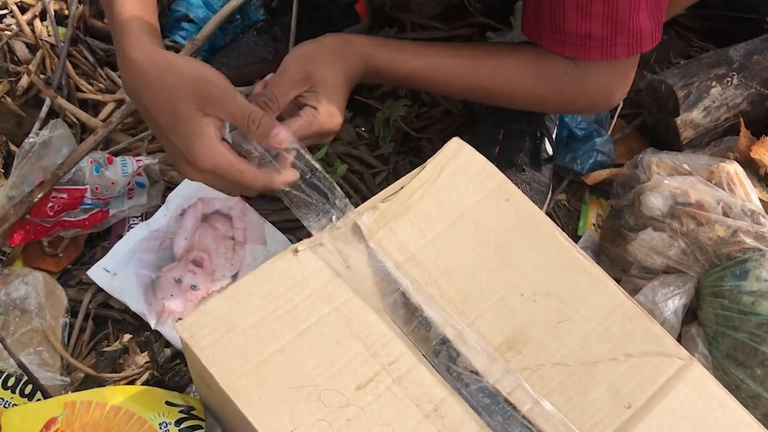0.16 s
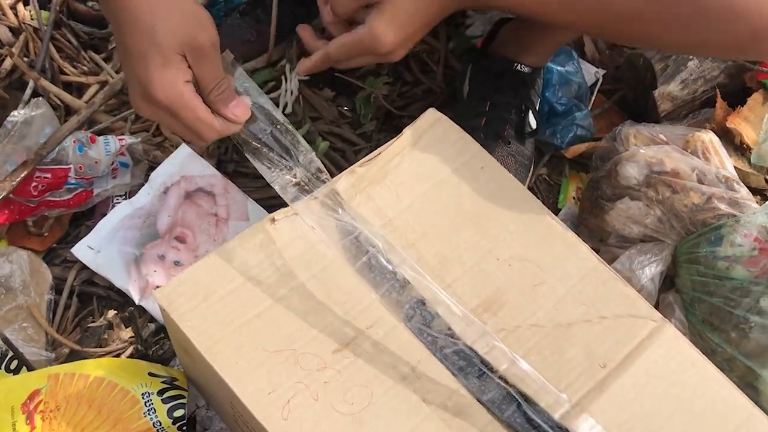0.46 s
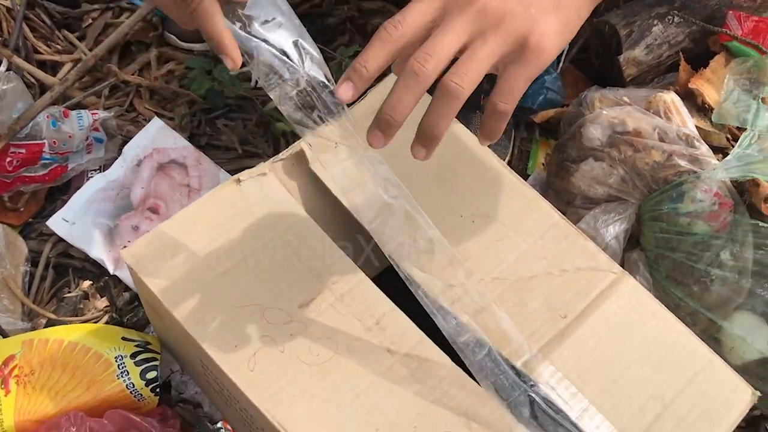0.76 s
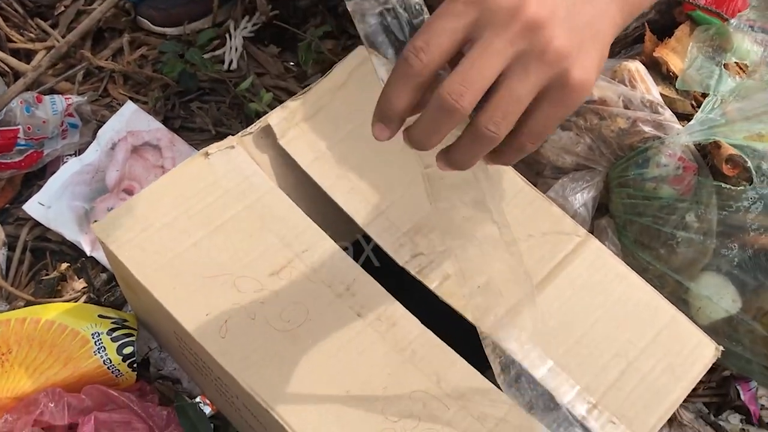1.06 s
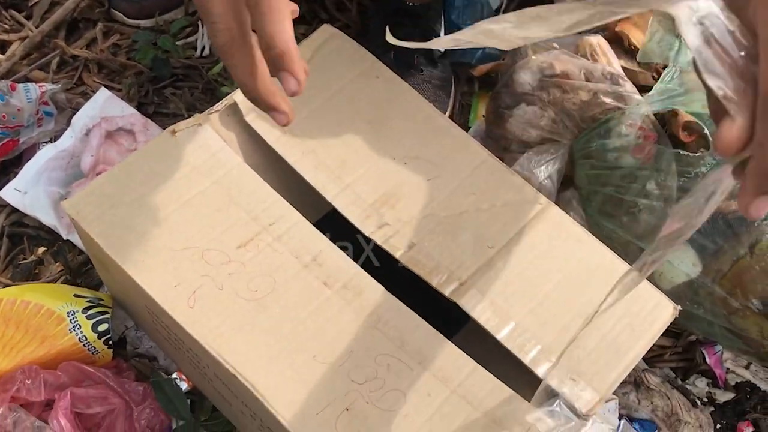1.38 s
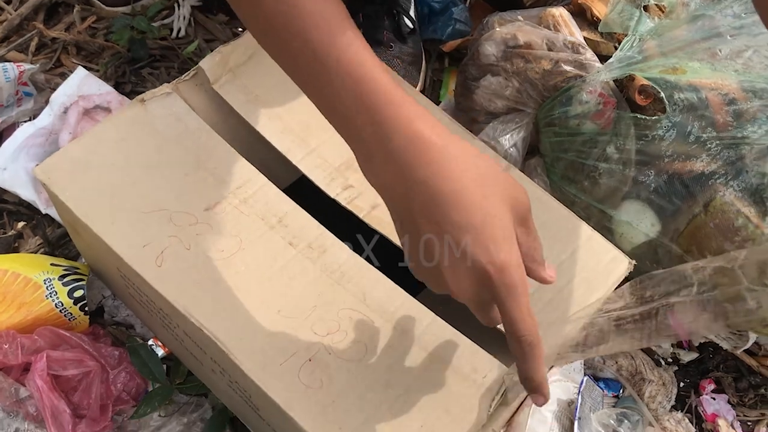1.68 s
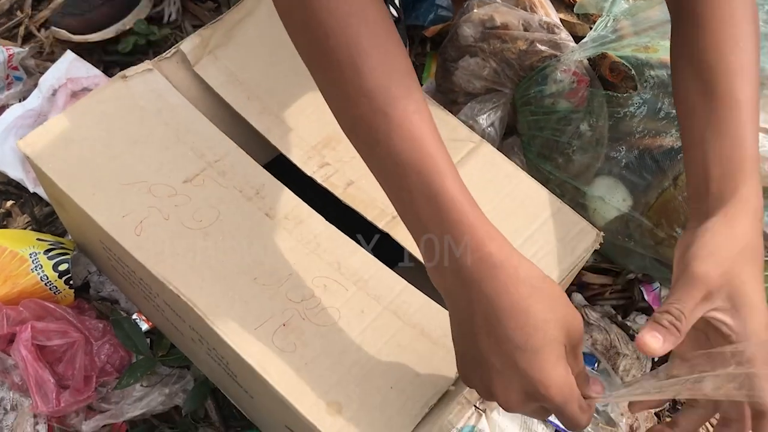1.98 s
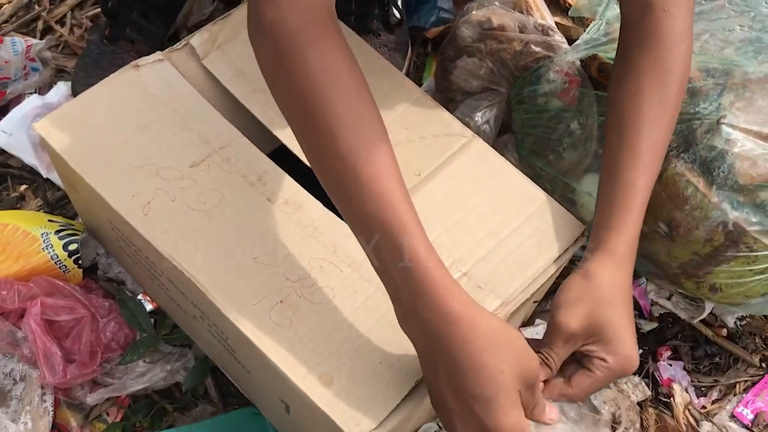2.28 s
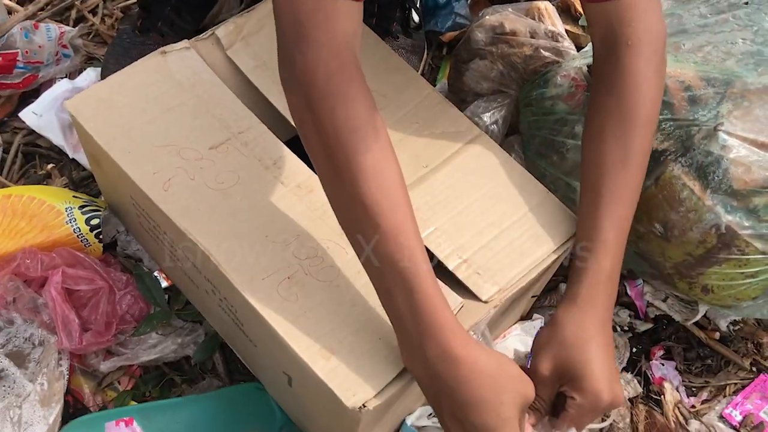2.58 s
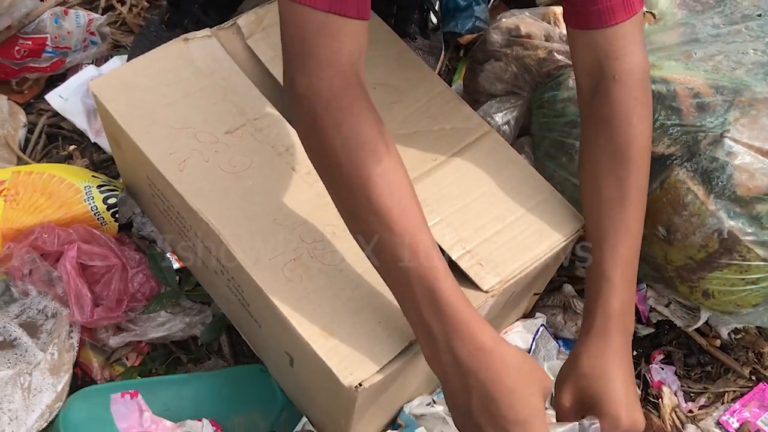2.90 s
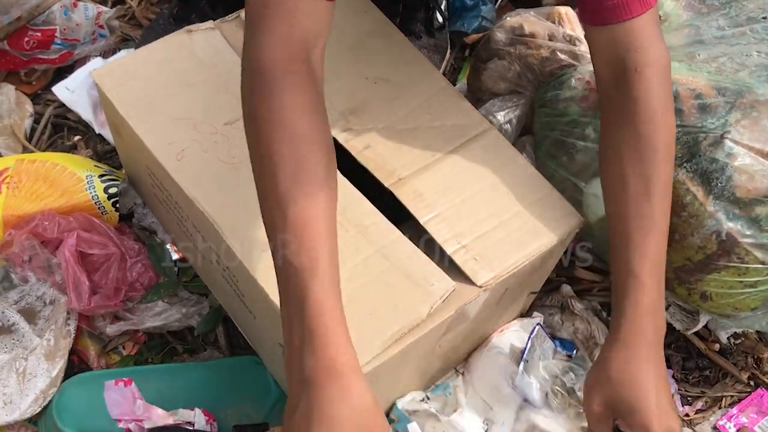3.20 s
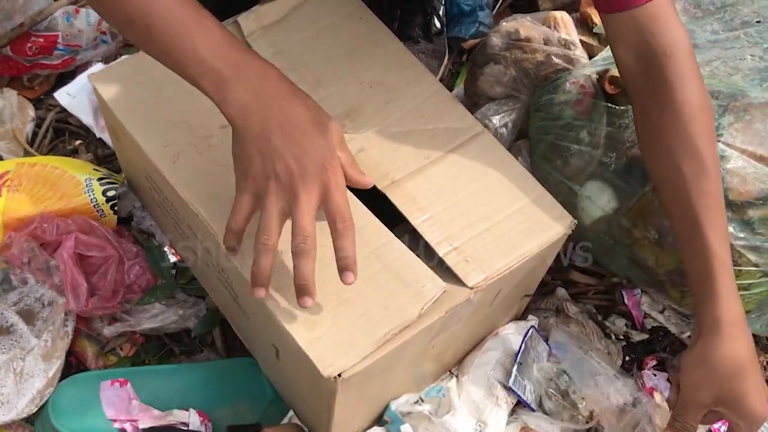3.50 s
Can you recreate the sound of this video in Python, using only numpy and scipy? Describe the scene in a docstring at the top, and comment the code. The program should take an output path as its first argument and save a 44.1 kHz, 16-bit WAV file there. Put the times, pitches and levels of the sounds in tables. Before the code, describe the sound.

Tape crackling and snapping off a hollow cardboard box, which knocks and scrapes near the end.

```python
"""Peeling tape off a box, outdoors

Hands peel clear packing tape off a cardboard box outdoors, close to a phone microphone.
Glue slips crackle as clustered noise bursts through the film and card; the film snaps as short ringing bursts.
The box knocks and scrapes over litter, its hollow card ringing as decaying modes.
Far off come uneven low thumps, as pulsed sines, over the faint rumble and hiss of filtered noise."""
import sys
import numpy as np
from scipy import signal
from scipy.fft import rfft, irfft
from scipy.io import wavfile
from scipy.ndimage import uniform_filter1d

SR = 44100
rng = np.random.default_rng(int(sys.argv[2]) if len(sys.argv) > 2 else 0)


def generate_wav(signal):
    """Clip the signal to [-1, 1] and save it as 16-bit WAV at the path in sys.argv[1]."""
    frames = np.transpose(np.atleast_2d(signal))
    scaled = np.clip(frames, -1, 1) * 32767
    pcm = np.round(scaled).astype(np.int16)
    wavfile.write(sys.argv[1], SR, pcm)


N = 160965  # samples

# Close: crackle of the peeling tape: t/s, level of the film/dB, level of the card against the film/dB
PEEL_LEVELS = [(0.0, -59, -4), (0.033, -48, -6.5), (0.076, -67, 0), (0.225, -64, -4.5), (0.259, -57, 0),
               (0.348, -55.5, -9.5), (0.365, -44, -0.5), (0.396, -48, -15.5), (0.408, -26.5, -16.5),
               (0.42, -43, -14), (0.436, -52, 2.5), (0.507, -55, -1), (0.687, -53, -12.5),
               (0.728, -37, -12.5), (0.776, -60.5, 0.5), (0.962, -60.5, -6), (1.005, -44.5, -17.5),
               (1.032, -45, 8.5), (1.075, -59, -1), (1.1, -47.5, -8), (1.182, -63.5, -8), (1.21, -47, -6.5),
               (1.254, -42.5, -22), (1.29, -48.5, -3.5), (1.337, -67, -12), (1.659, -64, -3.5),
               (1.757, -62.5, -6.5), (1.834, -48.5, -2.5), (1.95, -50.5, -9.5), (2.075, -44.5, -7.5),
               (2.118, -55.5, 2.5), (2.225, -55, -4), (2.386, -46.5, 0), (2.681, -52, 5), (2.775, -42, 3),
               (2.848, -52, 1), (2.873, -39, -1), (2.897, -56, 4.5), (3.143, -52, -7), (3.202, -47.5, 0),
               (3.233, -78, -4), (3.359, -59.5, -5.5), (3.588, -74.5, -5), (3.615, -57, -3.5),
               (3.65, -50.5, -1.5)]
# How unevenly the glue lets go: t/s, share of the full scatter
GLUE_UNEVENNESS = [(1.85, 0.85), (1.92, 0.21), (2.09, 0.44), (2.17, 1.1), (2.45, 0.69), (2.95, 0.63),
                   (3.1, 0.96)]
# Tone of the crackle through the film: f/Hz, relative level/dB
FILM_TONE = [(500, -29.5), (2500, 0.5), (4000, 3), (10300, -1.5), (13000, 3), (15600, 0.5), (16300, -60)]
# Tone of the crackle through the card: f/Hz, relative level/dB
CARD_TONE = [(100, -48.5), (300, 12), (600, 8.5), (1400, 9), (2300, 4), (3500, 0), (6000, -47)]
# Close: snaps of the film, levels over the first 3 ms as a sine of equal power:
# t/s, ring level/dB, ring f/Hz, treble level/dB
FILM_SNAPS = [(0.0507, -35, 2430, -66), (0.072, -41.5, 3730, -49), (0.1896, -41, 1520, -48.5),
              (0.297, -37.5, 3160, -42), (0.3335, -36.5, 3600, -57), (0.3413, -40.5, 2210, -53),
              (0.3687, -36, 2920, -38), (0.382, -54, 4500, -38.5), (0.4221, -45, 4000, -36),
              (0.51, -41.5, 4730, -48), (0.568, -45.5, 3500, -65), (0.584, -45.5, 2500, -55),
              (0.6009, -41.5, 2960, -43), (0.65, -38.5, 4140, -61), (0.6688, -37.5, 3540, -53),
              (0.823, -34.5, 3750, -51), (0.871, -33.5, 4000, -68), (0.9194, -41.5, 2530, -62),
              (0.9748, -39.5, 4200, -64), (1.0268, -35, 4000, -46), (1.0315, -20, 4200, -35),
              (1.0493, -39, 2690, -34.5), (1.17, -42, 2770, -61), (1.2075, -37, 3460, -54),
              (1.2734, -32, 3000, -30.5), (1.294, -39, 3030, -36.5), (1.5411, -48.5, 4490, -44),
              (1.5993, -47, 1870, -68), (1.6469, -41, 1400, -56), (1.7039, -53, 3220, -43),
              (1.8082, -42.5, 3980, -45), (1.8253, -32, 3760, -37), (1.8376, -34.5, 3900, -49),
              (1.877, -37.5, 2950, -35.5), (2.141, -51, 4500, -42.5), (2.248, -37, 2240, -42),
              (2.2721, -43, 2960, -38), (2.3026, -45, 4000, -36.5), (2.3873, -39, 2100, -35.5),
              (2.4165, -41, 3500, -42), (2.54, -49, 2520, -34), (2.5687, -44, 2160, -35.5),
              (2.593, -38, 1930, -30), (2.6133, -23, 1700, -19.5), (2.728, -40, 2120, -32.5),
              (2.7555, -33.5, 2900, -45), (2.874, -26.5, 2200, -39), (3.003, -44, 2170, -64),
              (3.0886, -51, 4400, -40.5), (3.14, -17, 3500, -21.5), (3.1744, -28, 2300, -36),
              (3.198, -39, 1037, -43), (3.251, -49.5, 2900, -48), (3.3124, -42.5, 2640, -52),
              (3.3841, -48, 2830, -68), (3.4609, -50, 4120, -60), (3.524, -47, 2970, -69),
              (3.5574, -41, 2210, -45.5)]
# Modes of the hollow box, deepest first: f/Hz, relative level/dB, t60/s
BOX_MODES = [(94.7, -9, 0.038), (203.6, -2, 0.11), (245.3, -3, 0.085), (302.3, -1.5, 0.061),
             (418, -5, 0.042), (570, -9.5, 0.027), (704, -1, 0.028), (1050, 3, 0.012), (1558, -0.5, 0.026),
             (1955, 5, 0.011)]
# Close: knocks on the box: t/s, peak level/dB, pitch f/Hz
BOX_KNOCKS = [(.189, -32.5, 346), (.19, -40.5, 1020), (0.448, -42, 700), (1.0315, -17, 1440),
              (1.033, -28, 279.5), (1.274, -30.5, 2000), (1.276, -38, 740), (1.647, -36.5, 1195),
              (2.071, -45, 500), (2.307, -39, 780), (2.435, -30, 597), (2.616, -31, 244), (2.757, -30, 202),
              (2.872, -29.5, 536), (3.1401, -14.5, 2160), (3.142, -21, 880), (3.196, -30.5, 580)]
# Close: box shifting under the pull: t/s, scrape level/dB, deep rumble level/dB
BOX_SCRAPE = [(2.2, -69, -56.5), (2.34, -64, -60), (2.365, -62, -40), (2.43, -53, -51),
              (2.47, -48.5, -40.5), (2.53, -46.5, -38.5), (2.556, -54, -56), (2.62, -42, -59),
              (2.68, -41.5, -53), (2.7, -50, -68), (2.77, -34, -53), (2.82, -41, -45), (2.92, -45.5, -64),
              (3.06, -65, -62)]
# Far: low thumps: t/s
THUMP_TIMES = [0.041, 0.212, 0.32, .4, .585, .799, 1.05, 1.474, 1.611, 1.744, 3.081, 3.225, 3.357, 3.478,
               3.601]
# Tone of the open air: f/Hz, relative level/dB
AIR_TONE = [(18, -71), (30, 6.5), (134, -1.5), (600, -14.5), (1670, -13), (12300, -31), (16000, -46)]

# Glue: the spreads (dB) are those at full scatter
SLIPS_PER_S, SLIP_SPREAD_DB, SLIP_T60_S = 3500, 3.0, 0.0017
CLUSTERS_PER_S, CLUSTER_DB = 120, 3.5
# Lone larger slips: least level before each is scaled down at random, mean excess over it
TICKS_PER_S, TICK_DB, TICK_SPREAD_DB, TICK_T60_S = 220, 7, 2.5, 0.0064
# Film: ring width as a share of its pitch, then the burst and its sharp lead
SNAP_WIDTH, SNAP_TREBLE_HZ = 0.98, 4800
SNAP_SPREAD_DB, SNAP_T60_S, SNAP_LEAD_DB, SNAP_LEAD_S = 4, 0.02, 7, 0.0004
# Box: reach of a knock around its pitch, scatter of the modes
KNOCK_REACH_OCT, KNOCK_SCATTER_DB = 0.36, 4
RATTLE_DB, RATTLE_T60_S = -36, 0.04  # gain on cubed noise, against a unit blow
# Far thumps: peak of the envelope, pitch and its relative scatter
THUMP_DB, THUMP_HZ, THUMP_RISE_S, THUMP_SCATTER = -45.5, 54.4, 0.0074, 0.025
AIR_DB = -68  # middle level of the air
LOW_EDGE_HZ, HIGH_EDGE_HZ = 62.3, 16700


def undb(db):
    """Amplitude of a level in dB."""
    return 10 ** (np.asarray(db) / 20)


def unit(x):
    """Scale to an RMS of 1."""
    return x / np.sqrt(np.mean(x ** 2))


def curve(table, column):
    """A column of a table, drawn as straight lines in time."""
    table = np.array(table)
    return np.interp(np.arange(N) / SR, table[:, 0], table[:, column])


def colour(x, points):
    """Minimum-phase filter with the (f/Hz, level/dB) shape."""
    hz, db = np.array(points).T
    grid_hz = np.fft.rfftfreq(4096, 1 / SR)
    log_gain = np.interp(np.log(grid_hz + 1), np.log(hz), db) * np.log(10) / 20
    # Folding the cepstrum onto positive time makes the filter causal
    cepstrum = irfft(log_gain)
    cepstrum[1:2048] *= 2
    cepstrum[2049:] = 0
    response = irfft(np.exp(rfft(cepstrum)))
    return signal.fftconvolve(x, response)[:len(x)]


def walk(rate):
    """Random levels held 1 / rate s and slewed; spread near 1."""
    hold = int(SR / rate)
    steps = np.repeat(rng.standard_normal(N // hold + 1), hold)
    return uniform_filter1d(steps, hold // 2 + 1)[:N]


def add(out, x, s):
    """Mix x into out from s seconds on."""
    i = int(s * SR)
    out[i:i + len(x)] += x[:len(out) - i]


def ring(x, modes):
    """Sum of decaying modes driven by x."""
    t = np.arange(SR // 2) / SR
    response = sum(undb(db) * np.sin(2 * np.pi * hz * t) * 1000.0 ** (-t / t60)
                   for hz, db, t60 in modes)
    return signal.fftconvolve(x, response)[:len(x)]


def decay_power(clicks, t60):
    """Power of clicks that each die away by 60 dB in t60."""
    fall = 1e6 ** (-np.arange(900) / SR / t60)
    return signal.fftconvolve(clicks ** 2, fall)[:N]


def slips(cluster_db, ticks):
    """Tiny releases of glue: unequal clicks with short noisy tails, in clusters; level near 1."""
    when, size, tick_share = rng.random((3, N))
    uneven = curve(GLUE_UNEVENNESS, 1)
    clicks = (when < SLIPS_PER_S / SR) * undb(-SLIP_SPREAD_DB * uneven * np.log(size))
    power = decay_power(clicks, SLIP_T60_S) * undb(2 * cluster_db * uneven)
    power = power + decay_power(ticks * uneven * tick_share, TICK_T60_S)
    # Level against the mean of the surrounding 100 ms
    power = np.abs(power / uniform_filter1d(power, size=SR // 10))
    return np.sqrt(power) * rng.standard_normal(N)


def peel():
    """Slips sound through film patches, each with its own pitch and flicker, and through the card."""
    film_db = curve(PEEL_LEVELS, 1)
    card_db = film_db + curve(PEEL_LEVELS, 2)
    cluster_db = CLUSTER_DB * walk(CLUSTERS_PER_S)
    when, size = rng.random((2, N))
    ticks = (when < TICKS_PER_S / SR) * undb(TICK_DB - TICK_SPREAD_DB * np.log(size))
    film = np.zeros(N)
    for band_hz in (2000, 5500), (5500, 10000), (10000, 18000):
        patch = signal.butter(1, band_hz, "band", fs=SR, output="sos")
        film += signal.sosfilt(patch, slips(cluster_db + 4.9 * walk(90), ticks))
    card = colour(slips(cluster_db + 4.2 * walk(60), ticks / 2), CARD_TONE)
    return unit(colour(film, FILM_TONE)) * undb(film_db) + unit(card) * undb(card_db)


def level_head(x):
    """Scale the first 3 ms to the power of a sine of amplitude 1."""
    return x / np.sqrt(2 * np.mean(x[:130] ** 2))


def snaps():
    """Each snap is a sharp, dying noise burst: a broad ring of the film and a treble tick."""
    out = np.zeros(N)
    t = np.arange(2200) / SR
    treble = signal.butter(2, (SNAP_TREBLE_HZ, 16000), "band", fs=SR, output="sos")
    lead = 1 + undb(SNAP_LEAD_DB) * np.exp(-t / SNAP_LEAD_S)
    envelope = lead * 1000.0 ** (-t / SNAP_T60_S)
    for s, ring_db, hz, treble_db in FILM_SNAPS:
        noise, rough = rng.standard_normal((2, len(t)))
        # Averaging 9 samples cuts the spread to a third; 3 restores it
        flicker_db = SNAP_SPREAD_DB * uniform_filter1d(rough, size=9) * 3
        burst = noise * envelope * undb(flicker_db)
        body = signal.lfilter(*signal.iirpeak(hz, 1 / SNAP_WIDTH, SR), burst)
        tick = signal.sosfilt(treble, burst)
        add(out, level_head(body) * undb(ring_db) + level_head(tick) * undb(treble_db), s)
    return out


def knocks():
    """Each knock wakes the box modes near its own pitch and rattles briefly on small contacts."""
    out = np.zeros(N)
    t = np.arange(SR // 4) / SR
    for s, peak_db, near_hz in BOX_KNOCKS:
        modes = []
        for hz, mode_db, t60 in BOX_MODES[1:]:
            off_pitch_db = 10 * (np.log2(hz / near_hz) / KNOCK_REACH_OCT) ** 2
            scatter_db = KNOCK_SCATTER_DB * rng.standard_normal()
            modes.append((hz, mode_db + scatter_db - off_pitch_db, t60))
        # Cubing the noise leaves sparse, spiky contacts
        rattle = rng.standard_normal(len(t)) ** 3 * undb(RATTLE_DB) * 1000.0 ** (-t / RATTLE_T60_S)
        knock = ring(signal.unit_impulse(len(t)) + rattle, modes)
        add(out, knock / np.abs(knock).max() * undb(peak_db), s)
    return out


def scrape():
    """Rough, low-heavy friction noise drives the box modes, the deepest one apart as a rumble."""
    noise = rng.standard_normal((2, N))
    grit = signal.lfilter([1], [1, -0.97], noise) * undb(3.74 * walk(60))
    upper = unit(ring(grit[0], BOX_MODES[1:])) * undb(curve(BOX_SCRAPE, 1))
    deep = unit(ring(grit[1], BOX_MODES[:1])) * undb(curve(BOX_SCRAPE, 2))
    return upper + deep


def thumps():
    """Soft low pulses of two or three cycles: a sine under a quick rise and a slower fall."""
    out = np.zeros(N)
    t = np.arange(SR // 4) / SR
    envelope = t / THUMP_RISE_S * np.exp(1 - t / THUMP_RISE_S)
    for s in THUMP_TIMES:
        hz = THUMP_HZ * (1 + THUMP_SCATTER * rng.standard_normal())
        add(out, undb(THUMP_DB) * envelope * np.sin(2 * np.pi * hz * t), s)
    return out


def air():
    """Faint outdoor rumble and hiss: coloured noise of wandering level."""
    return unit(colour(rng.standard_normal(N), AIR_TONE)) * undb(AIR_DB + 4.5 * walk(5.14))


def scene():
    """Tape and box close by, thumps far off, air all round; one channel."""
    return (peel() + snaps() + knocks() + scrape() + thumps() + air())[None]


def record(dry):
    """Drops the deepest bass and low-passes steeply near 16.7 kHz."""
    high_pass = signal.butter(3, LOW_EDGE_HZ, "high", fs=SR, output="sos")
    low_pass = signal.ellip(10, 0.2, 75, HIGH_EDGE_HZ, fs=SR, output="sos")
    return signal.sosfilt(low_pass, signal.sosfilt(high_pass, dry))


dry = scene()
out = record(dry)
generate_wav(out)
```